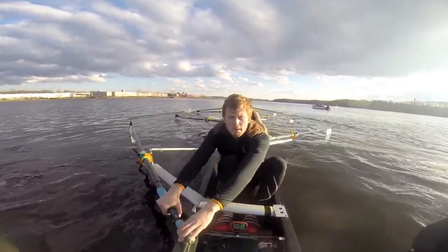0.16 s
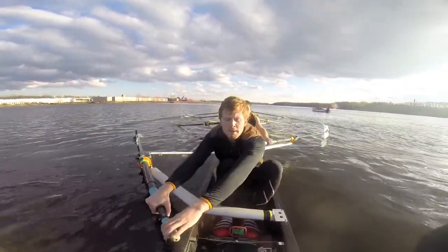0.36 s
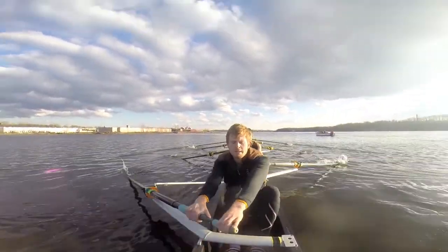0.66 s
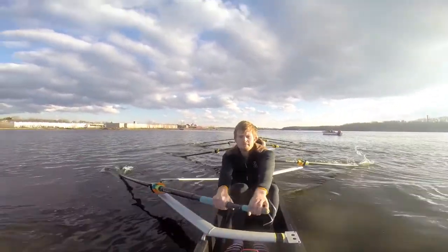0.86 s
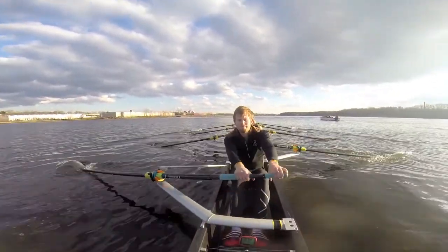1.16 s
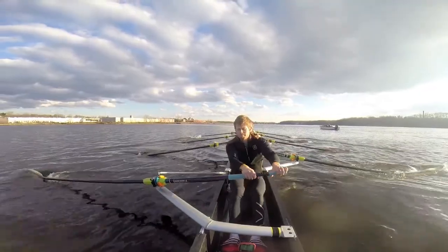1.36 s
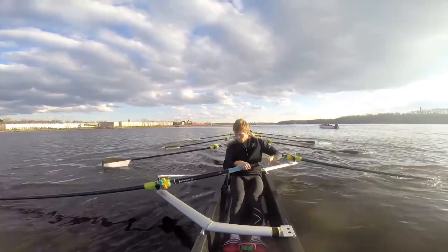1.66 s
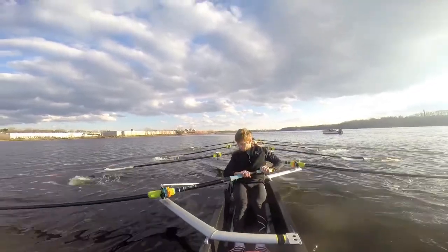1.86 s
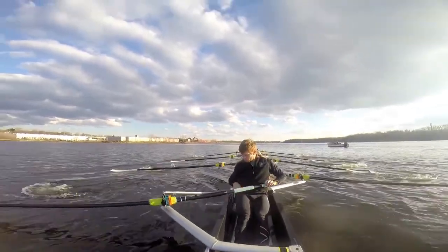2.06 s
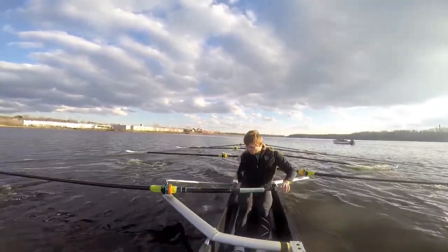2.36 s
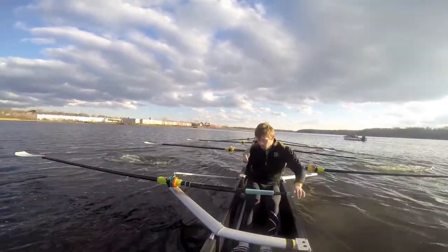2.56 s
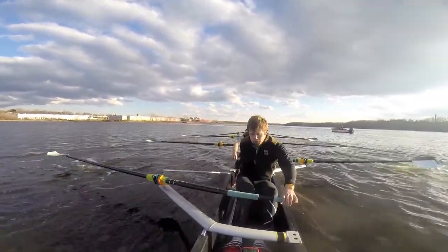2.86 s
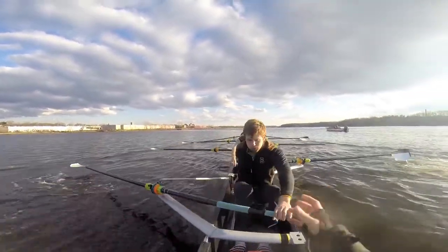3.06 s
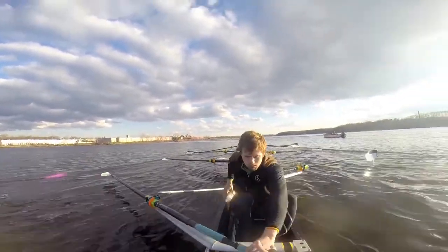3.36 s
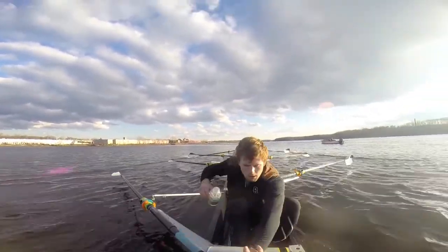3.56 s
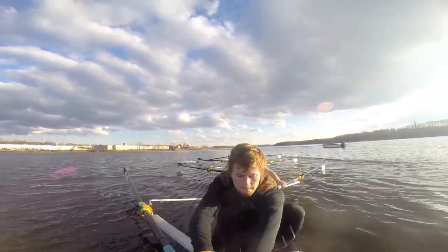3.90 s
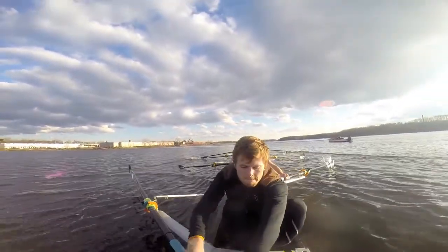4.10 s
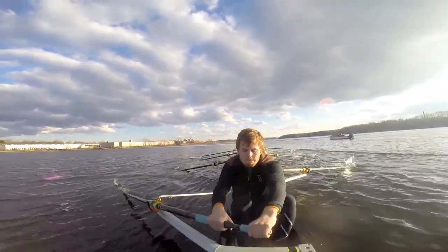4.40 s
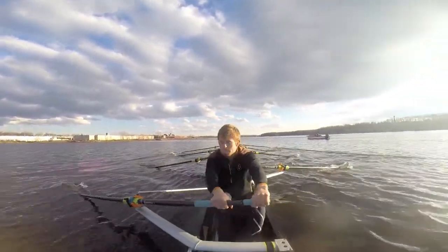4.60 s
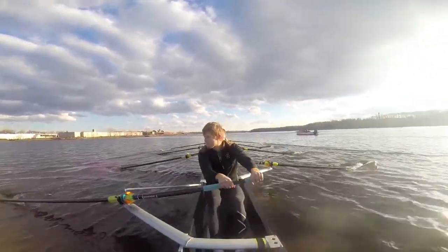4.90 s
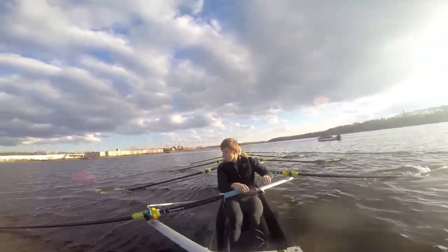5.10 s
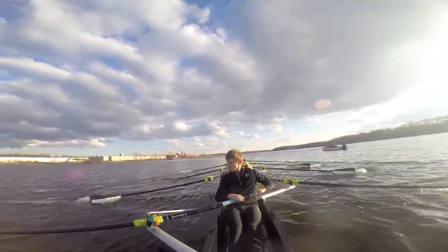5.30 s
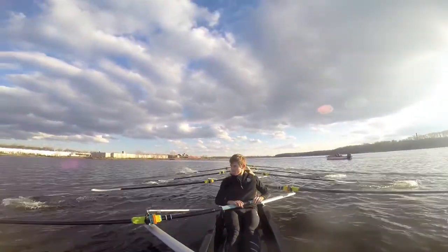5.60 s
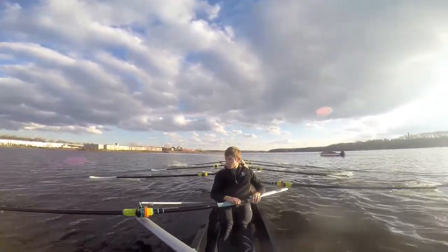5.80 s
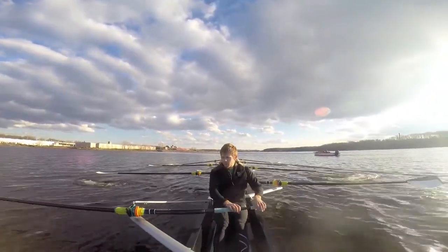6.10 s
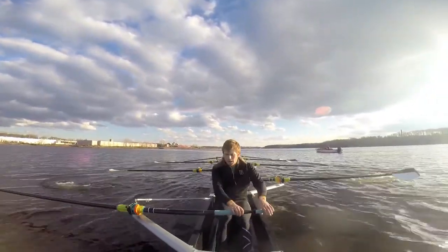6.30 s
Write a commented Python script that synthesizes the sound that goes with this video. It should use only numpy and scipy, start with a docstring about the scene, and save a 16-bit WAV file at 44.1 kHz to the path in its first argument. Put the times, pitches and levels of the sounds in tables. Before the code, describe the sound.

Close rubbing and thumping on plastic gives way to a rowing boat's clicking oarlocks, low hull thuds and gurgling water.

```python
"""Racing boat, rowed on open water

Heard from a cased camera worn in the stern. First a hand and sleeve rub, scrape, press and bump
the plastic case. Then oars click in their locks, the hull booms softly as seats and oars shift,
and blades stir up spray and bubbles. Light wind rumbles; the camera faintly hisses and whines."""
import sys
import numpy as np
from scipy import signal
from scipy.fft import rfft, irfft, next_fast_len
from scipy.io import wavfile
from scipy.ndimage import map_coordinates

SR = 44100
rng = np.random.default_rng(int(sys.argv[2]) if len(sys.argv) > 2 else 0)


def wav_out(sig):
    """Save sig, one row per channel (or a flat mono array), as 16-bit PCM at SR to the path in sys.argv[1]."""
    wavfile.write(sys.argv[1], SR, np.round(np.clip(np.atleast_2d(sig).T, -1, 1) * 32767).astype(np.int16))


N = 284445
TIME_S = np.arange(N) / SR

# Table levels are relative within each layer.
# oarlock clicks: (time [s], level [dB], pitch [Hz], mode tilt [dB/octave], knock offset [dB])
LOCK_CLICKS = [(1.927, -29.5, 1980, -27, -4), (2.0855, -34.5, 2270, -1, -4), (2.4952, -38.5, 2600, -18, 6),
               (2.816, -41.5, 2250, 1, -7), (2.857, -40.5, 2260, -4, 2), (3.1348, -39, 2180, 3, -3),
               (3.2847, -43, 2370, 4, -4), (3.461, -31, 2240, -6.5, -3.5), (3.4681, -34, 2150, -3, -2),
               (3.8694, -40.5, 2800, -2, -3), (3.9035, -42, 2170, 15, -23), (3.937, -31.5, 2200, 0, -12),
               (3.9418, -35.5, 2560, -9, -4.5), (4.148, -38.5, 2130, -0.5, -21),
               (4.1868, -45, 2400, 2, -23), (4.2496, -31, 1970, 5, -18), (4.4042, -35.5, 2730, -3, -12),
               (4.4413, -36.5, 2400, 12, -22), (5.1063, -34.5, 2660, -24, -5.5), (5.443, -35, 2420, 3, -8),
               (5.475, -37, 2550, 9, -28), (5.5433, -39, 2100, 5, -28)]
# oarlock modes: (pitch ratio [-], level [dB], t60 [s])
LOCK_MODES = [(.45, -24, .008), (1, 9.5, 0.024), (1.25, -33, 0.015), (1.98, 6.5, 0.016), (2.6, 8.5, 0.007),
              (2.87, 6.5, 0.0059)]
# hull booms: (time [s], level [dB], pitch [Hz])
HULL_BOOMS = [(1.802, -23, 77.5), (1.963, -11, 122), (2.33, -14.5, 90.6), (2.361, -21, 118),
              (2.498, -14, 96), (2.569, -17, 83), (2.633, -19, 127), (2.83, -25.5, 85), (4.104, -32, 109),
              (4.794, -28, 131.5), (5.12, -25.5, 122), (5.178, -24.5, 105), (5.214, -21, 123),
              (5.679, -28, 176)]
# reverberation of the boat: (frequency [Hz], t60 [s])
BOAT_DECAY = [(200, 0.35), (2000, 0.085), (10000, 0.028)]
# water surges: (crest time [s], wash [dB], gurgle [dB], fade [dB/s])
SURGES = [(1.95, -53.5, -51, 11), (2.851, -71, -63, 68), (3.95, -59.5, -55.5, 43), (4.35, -58.5, -56, 24),
          (4.78, -57.5, -53.5, 53), (5.15, -55, -54, 16), (5.53, -54, -52.5, 12.5)]
# air pockets closing behind blades and along the hull: (time [s], level [dB], pitch [Hz])
PLOPS = [(2.052, -33.5, 373), (2.086, -41, 420), (3.863, -42, 588), (3.987, -37.5, 480), (4.015, -40, 470),
         (4.279, -47, 377), (4.444, -42.5, 584), (5.449, -35.5, 456), (5.519, -46, 390), (5.573, -45, 392)]
# bumps on the case: (time [s], thump [dB], nominal pitch [Hz], tick [dB])
BUMPS = [(0.077, -25, 100, -34.5), (0.134, -19.5, 138, -37), (0.151, -26, 149, -48),
         (0.155, -27, 130, -33.5), (0.201, -17.5, 148, -34), (0.232, -40, 119, -36.5),
         (0.316, -32, 127, -38.5), (0.4027, -18, 105, -24), (0.4669, -24.5, 101, -22.5),
         (0.549, -19.5, 103, -38), (0.659, -19.5, 94, -20.5), (0.9817, -4, 110, -27.5),
         (1.016, -30, 103, -52), (1.138, -25.5, 105, -16), (1.165, -11.5, 82, -61),
         (1.479, -25.5, 176, -62), (1.491, -26, 100, -39), (1.5538, -15.5, 85.5, -29),
         (1.678, -26, 155, -66), (2.495, -21, 94, -41.5)]
# hand presses: (time [s], length [s], pressure [dB])
PRESSES = [(0, 0.33, -13.5), (0.384, 0.082, -12), (0.666, 0.023, -18)]
# finger scrapes: (time [s], length [s], level [dB])
SCRAPES = [(0, .046, -29.5), (0.263, 0.0021, -40.5), (0.28, .008, -39.5), (.341, 0.001, -40),
           (0.411, 0.027, -14.5), (0.472, 0.0098, -35), (.492, 0.0021, -34.5), (0.602, 0.011, -35.5),
           (.655, 0.026, -21), (0.689, 0.019, -30.5), (.783, 0.0098, -49)]
# sleeve strokes: (time [s], length [s], level [dB], swell [dB], brightness [dB])
RUBS = [(0, 0.11, -46, -17.5, 10), (0.148, 0.017, -45, 8, 2), (0.208, 0.18, -54, 3, 4.5),
        (0.529, 0.2, -40, 4.5, -0.5), (0.775, 0.037, -33.5, -1.5, 6.5), (0.825, 0.13, -44.5, 0, 2),
        (0.986, 0.18, -45.5, 13, 6.5), (1.15, 0.2, -45.5, -10, 8.5), (1.352, 0.023, -33.5, 1.5, -9),
        (1.402, .085, -34, 2.5, -0.5), (1.54, 1.025, -50.5, -17.5, -12)]

# case resonances by type of contact: (frequency [Hz], nominal width [Hz], level [dB])
TAP_MODES = [(446, 160, -15), (940, 140, -15.5), (1310, 250, -15.5), (1840, 250, 6), (2400, 120, 7),
             (2970, 510, 1), (3870, 78, 2), (5600, 140, -24)]
SCRAPE_MODES = [(1285, 37, 0), (2010, 85, -7), (2360, 130, -8.5), (2690, 28, -3), (3220, 93, -9.5),
                (3610, 65, -17), (4275, 93, -4.5), (5840, 140, -9), (7500, 240, -7), (9420, 220, -11)]
DULL_RUB_MODES = [(1170, 300, -9.5), (1733, 320, 4), (2245, 310, -4), (2927, 180, -7.5)]
BRIGHT_RUB_MODES = [(2755, 380, 9.5), (4300, 680, -6.5), (5600, 380, -4), (6090, 240, -10),
                    (9030, 470, -26)]

# noise spectra: (frequency [Hz], level [dB])
CRACK_TONE = [(800, -8.5), (2300, 9), (3400, -3.5), (4500, 9.5), (6200, -4), (8000, -18), (15000, -25.5)]
KNOCK_TONE = [(250, -15), (520, 0), (700, -4.5), (900, -1.5), (1800, -23), (5000, -49)]
WASH_TONE = [(300, -8), (500, 4), (850, -1), (1250, -10.5), (1550, 3), (1850, 0), (2200, 7), (2750, 3.5),
             (3300, -4.5), (4500, 2.5), (5200, -6), (6200, -3), (7200, -19), (15000, -37)]
CHURN_TONE = [(120, -23), (300, -0.5), (500, -10.5), (800, -10), (2000, -13), (5000, -64)]
SHUDDER_TONE = [(8, -0.5), (25, -5.5), (55, 1.5), (100, -17.5), (250, -23), (700, -82), (2000, -100)]
SCRAPE_TONE = [(300, -10), (700, -19), (1300, -10), (2000, 4.5), (2800, -2.5), (3500, -4), (4300, -5.5),
               (4900, -11.5), (5900, -1), (6700, -14.5), (7600, -20), (9500, -21), (11000, -31.5),
               (15000, -35)]
DULL_RUB_TONE = [(200, -3), (700, 3.5), (1500, 10.5), (3000, -20), (3600, -7), (6200, -11.5), (7200, -44),
                 (15000, -67)]
BRIGHT_RUB_TONE = [(1500, 6), (3200, 8), (6300, 0.5), (7500, -1.5), (11000, -12), (15000, -20)]
WIND_TONE = [(10, -62), (25, 2.5), (45, 0), (80, -6.5), (130, -6), (230, -17), (400, -28.5), (700, -32),
             (1500, -51), (4000, -120)]
HISS_TONE = [(100, 19), (2000, 4.5), (7000, -6), (11000, -7.5), (15000, -19)]
# electronic whine: (frequency [Hz], level [dB])
WHINE_PARTIALS = [(5846, -76), (8780, -92), (11705, -84), (14626, -90)]

SURGE_RISE_DB_PER_S, CALM_WASH_DB, CALM_GURGLE_DB = 50, -63, -63
HAND_ATTACK_DB_PER_S, HAND_ARCH_DB, HAND_RELEASE_T60_S = 20 / 0.052, 2, 0.12
FLEX_HZ, RESTING_PRESSURE_DB = 15, -51
SCRAPE_RISE_S, SCRAPE_T60_S = 0.0047, 0.032
HELD_DB, SLACKEN_AT_S, SLACKEN_DB_PER_S = -36, 1.9, 19
WIND_DB, GUST_DB = -49.5, 2.4
BUZZ_START_S, BUZZ_PERIOD_S, BUZZ_LENGTH_S = 1.57, 1.11, 0.055
BAND_LIMIT_HZ = 15200


def oarlocks():
    """The oar's collar snaps against the lock: crack, short modes, dull knock of the rigger."""
    out, t = np.zeros(N), np.arange(SR // 8) / SR
    for s, db, pitch_hz, tilt_db, knock_db in LOCK_CLICKS:
        ring = np.zeros(len(t))
        for ratio, mode_db, t60_s in LOCK_MODES:
            start_db = mode_db + 2 * rng.standard_normal() + tilt_db * np.log2(ratio)
            ring += amp(start_db) * decay(t, t60_s) * np.sin(2 * np.pi * pitch_hz * ratio * t)
        crack = noise(CRACK_TONE, len(t)) * decay(t, t60_s=0.011)
        click = crest(crest(ring) + 0.56 * crack)
        knock = amp(knock_db - 10) * noise(KNOCK_TONE, len(t)) * decay(t, t60_s=0.028)
        add(out, s, amp(db + 2) * onset(t, tau_s=0.00014) * (click + knock))
    return out


def hull():
    """The hollow hull swells into a few low cycles and dies."""
    out, t = np.zeros(N), np.arange(SR // 4) / SR
    for s, db, hz in HULL_BOOMS:
        upper_hz = hz * (1.4 + 0.078 * rng.standard_normal())
        ring = np.sin(2 * np.pi * hz * t) + 0.25 * np.sin(2 * np.pi * upper_hz * t)
        boom = ring * decay(t, t60_s=0.067) * onset(t, tau_s=0.011) ** 2
        add(out, s, amp(db - 7.5) * crest(boom))
    return out


def water():
    """Blades and hull stir up fizzing spray, with gurgles beneath."""
    wash_db = power_sum_db([amp(CALM_WASH_DB)] + [surge(s, db, fade) for s, db, _, fade in SURGES])
    gurgle_db = power_sum_db([amp(CALM_GURGLE_DB)] + [surge(s, db, fade) for s, _, db, fade in SURGES])
    spray = rng.standard_normal(N) + 0.26 * bubbles(1084, 6500, cycles=8, count=1800)
    wash = amp(wash_db - 3 + 1.1 * wobble(23)) * coloured(spray, WASH_TONE)
    # small bubbles grow louder twice as fast as the wash, in dB
    burble = amp(-62.5 + 2 * (wash_db + 53)) * bubbles(1400, 2600, cycles=16, count=900)
    churn = noise(CHURN_TONE) + 0.49 * bubbles(246, 570, cycles=5.5, count=600)
    gurgle = amp(gurgle_db - 4.5) * unit(churn)
    return wash + burble + gurgle


def surge(crest_s, db, fade_db_per_s):
    """Gain of water building to a crest and settling."""
    return amp(db - SURGE_RISE_DB_PER_S * until_s(crest_s) - fade_db_per_s * since_s(crest_s))


def bubbles(low_hz, high_hz, cycles, count):
    """Bubble cloud; each bubble rises in pitch as it dies."""
    when, pitch, strength = rng.random((count, 3)).T[:, :, None]
    hz = low_hz * (high_hz / low_hz) ** pitch
    step = np.arange(SR // 40)
    age = step / SR * hz / cycles
    envelope = amp(20 * strength) * np.exp(-4 * age) * (1 - np.exp(-25 * age))
    pings = envelope * np.sin(2 * np.pi * cycles * age * (1 + 0.059 * age))
    index = (when * N).astype(int) + step
    return unit(np.bincount(index.ravel(), pings.ravel(), N)[:N])


def plops():
    """An air pocket breaks into three large bubbles that ring briefly, rising in pitch."""
    out, t = np.zeros(N), np.arange(SR // 10) / SR
    for s, db, hz in PLOPS:
        for order, (lag, detune) in enumerate(rng.random((3, 2))):
            pitch_hz = hz * 2 ** (0.5 * (detune - 0.5)) * (1 + 3 * t)
            ring = glide(pitch_hz) * decay(t, t60_s=0.066) * onset(t, tau_s=0.0012)
            delay_s = order * (0.00333 + 0.00866 * lag)
            add(out, s + delay_s, amp(db - 5 - 14 * order) * crest(ring))
    return out


def boat_reverb(x):
    """Hull, crew and water scatter a short tail."""
    hz, t, spectrum = signal.stft(rng.standard_normal(SR // 4), SR, nperseg=256)
    t60_s = log_interp(BOAT_DECAY, hz)[:, None]
    _, tail = signal.istft(spectrum * decay(t, t60_s), SR, nperseg=256)
    delayed = np.pad(x, (SR // 300, 0))
    return signal.fftconvolve(delayed, tail / np.linalg.norm(tail))[:N]


def bumps():
    """The bumped case gives a damped thump, sagging in pitch, and a plastic tick."""
    out, t = np.zeros(N), np.arange(SR // 8) / SR
    for s, db, hz, tick_db in BUMPS:
        pitch_hz = hz * (0.5 + 1.43 * np.exp(-t / 0.0035))
        thump = -glide(pitch_hz) * decay(t, t60_s=0.045) * onset(t, tau_s=0.0016)
        add(out, s, amp(db + 2.5) * crest(thump))
        grit = 0.024 * rng.standard_normal(len(t)) * decay(t, t60_s=0.099)
        modes = [(f, width, level + 2 * rng.standard_normal()) for f, width, level in TAP_MODES]
        tick = resonant(signal.unit_impulse(len(t)) + grit, modes)
        # a gentle touch lasts longer, so sounds duller
        cutoff_hz = np.clip(1500 * 2 ** ((tick_db + 17) / 14), 1000, 4500)
        tick = signal.lfilter(*signal.butter(2, cutoff_hz, fs=SR), tick)
        add(out, s, amp(tick_db + 20.5) * tick / np.linalg.norm(tick))
    return out


def flexing():
    """The pressed case pumps slow pressure swings onto the microphone, with a low shudder."""
    pressure_db = power_sum_db([amp(RESTING_PRESSURE_DB)] + [hand_move(*press) for press in PRESSES])
    swing = unit(glide(FLEX_HZ * np.exp(0.2 * wobble(25))))
    shudder = noise(SHUDDER_TONE)
    # a firm press mostly bends the case
    shudder_db = np.minimum(pressure_db, -23 + 0.2 * pressure_db)
    return amp(pressure_db) * swing + amp(shudder_db + 3.1 * wobble(13)) * shudder


def scraping():
    """A fast finger slide sets the case ringing."""
    envelope = np.zeros(N)
    for s, length_s, db in SCRAPES:
        rise = np.clip((TIME_S - s) / SCRAPE_RISE_S, 0, 1)
        envelope += amp(db) * rise * decay(since_s(s + length_s), SCRAPE_T60_S)
    grit = coloured(slips(rate_hz=9300, spread_db=3), SCRAPE_TONE)
    steady_rms = np.std(resonant(grit, SCRAPE_MODES, direct=0.58))
    return resonant(grit * envelope, SCRAPE_MODES, direct=0.37) / steady_rms


def rubbing():
    """Cloth drags in tiny slips; each stroke has its own mix of dull and bright case resonances."""
    grip = amp(2 * wobble(130))

    def drag():
        return slips(rate_hz=7000, spread_db=6) * grip

    def ring(modes):
        out = np.zeros(N)
        for hz, width_hz, db in modes:
            sway = amp(3.5 * wobble(14.01))  # the contact point moves
            band = [(hz, 1.26 * width_hz, 0)]
            out += amp(db) * sway * resonant(resonant(drag(), band), band)
        return unit(out)

    strokes = [(hand_move(*move), brightness_db) for *move, brightness_db in RUBS]
    dull_db = power_sum_db(gain for gain, _ in strokes)
    bright_db = power_sum_db(gain * amp(brightness_db) for gain, brightness_db in strokes)
    dull = ring(DULL_RUB_MODES) + amp(-7.5) * coloured(drag(), DULL_RUB_TONE)
    bright = ring(BRIGHT_RUB_MODES) + amp(-14.5) * coloured(drag(), BRIGHT_RUB_TONE)
    return amp(dull_db + 1.5) * dull + amp(bright_db - 3) * bright


def hand_move(s, length_s, db, swell_db=0):
    """Gain of one hand move: attack, arched hold that swells or sags, release."""
    progress = np.clip((TIME_S - s) / length_s, 0, 1) - 0.5
    hold_db = db + swell_db * progress - HAND_ARCH_DB * (2 * progress) ** 2
    attack = amp(-HAND_ATTACK_DB_PER_S * until_s(s))
    release = decay(since_s(s + length_s), HAND_RELEASE_T60_S)
    return attack * amp(hold_db) * release


def slips(rate_hz, spread_db):
    """Friction as random impulses of uneven size."""
    hits = rng.random(N) < rate_hz / SR
    return unit(hits * rng.choice([-1, 1], N) * amp(spread_db * rng.standard_normal(N)))


def wind():
    """Light wind rumbles unevenly on the case; the holding hand adds rumble until it slackens."""
    held = amp(HELD_DB - SLACKEN_DB_PER_S * since_s(SLACKEN_AT_S))
    rumble_db = power_sum_db([amp(WIND_DB), held])
    return amp(rumble_db + GUST_DB * wobble(9.9)) * noise(WIND_TONE)


def electronics():
    """Faint camera whine, thin periodic buzz and hiss."""
    whine = sum(amp(db) * unit(np.sin(2 * np.pi * hz * TIME_S + 0.5 * wobble(86)))
                for hz, db in WHINE_PARTIALS)
    gate = (TIME_S >= BUZZ_START_S) & (since_s(BUZZ_START_S) % BUZZ_PERIOD_S < BUZZ_LENGTH_S)
    buzz = amp(-74) * gate * np.sin(2 * np.pi * 10200 * TIME_S + 1.5 * wobble(250))
    return whine + buzz + amp(-63.5) * noise(HISS_TONE)


def amp(db):
    return 10 ** (np.asarray(db) / 20)


def power_sum_db(gains):
    return 10 * np.log10(sum(gain ** 2 for gain in gains) + 1e-20)


def unit(x):
    """Scale to rms 1."""
    return x / np.sqrt(np.mean(x ** 2) + 1e-20)


def crest(x):
    """Scale to peak 1."""
    return x / (np.abs(x).max() + 1e-20)


def until_s(s):
    return np.maximum(s - TIME_S, 0)


def since_s(s):
    return np.maximum(TIME_S - s, 0)


def onset(t, tau_s):
    return 1 - np.exp(-t / tau_s)


def decay(t, t60_s):
    return amp(-60 * t / t60_s)


def glide(hz):
    """Sine of varying frequency."""
    return np.sin(2 * np.pi * np.cumsum(hz) / SR)


def wobble(rate_hz):
    """Smooth random curve with knots at rate_hz."""
    return map_coordinates(rng.standard_normal(4096), [TIME_S * rate_hz], mode="wrap")


def log_interp(points, hz):
    knots_hz, values = np.transpose(points)
    return np.interp(np.log(hz + 1), np.log(knots_hz + 1), values)


def filtered(x, response):
    """Apply a complex frequency response."""
    size = next_fast_len(len(x) + 8192)
    hz = np.fft.rfftfreq(size, 1 / SR)
    return irfft(rfft(x, size) * response(hz), size)[:len(x)]


def coloured(x, tone):
    """Shape x by a spectrum; rms 1."""
    return unit(filtered(x, lambda hz: amp(log_interp(tone, hz))))


def noise(tone, samples=N):
    return coloured(rng.standard_normal(samples), tone)


def resonant(x, modes, direct=0):
    """Parallel band-pass resonators plus a direct path."""
    def response(hz):
        return direct + sum(amp(db) * 1j * hz * width_hz / (mode_hz ** 2 - hz ** 2 + 1j * hz * width_hz)
                            for mode_hz, width_hz, db in modes)
    return filtered(x, response)


def add(track, s, sound):
    """Mix a sound into the track at time s."""
    start = max(round(s * SR), 0)
    track[start:start + len(sound)] += sound[:N - start]


def scene():
    """Mono mix of rowing, case handling and background."""
    locks = oarlocks()
    handling = rubbing() + scraping() + flexing() + bumps()
    rowing = locks + amp(-7) * boat_reverb(locks) + hull() + water() + plops()
    return (rowing + handling + wind() + electronics())[None]


def record(dry):
    """The camera clips at full scale, then band-limits."""
    return filtered(np.clip(dry[0], -1, 1), lambda hz: hz < BAND_LIMIT_HZ)[None]


dry = scene()
out = record(dry)
wav_out(out)
```